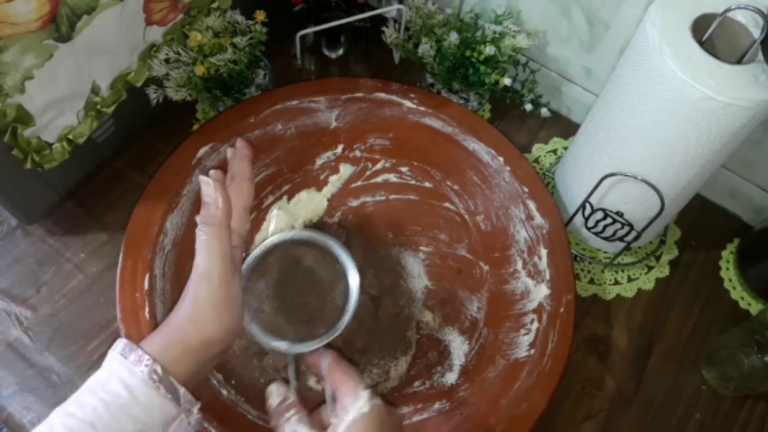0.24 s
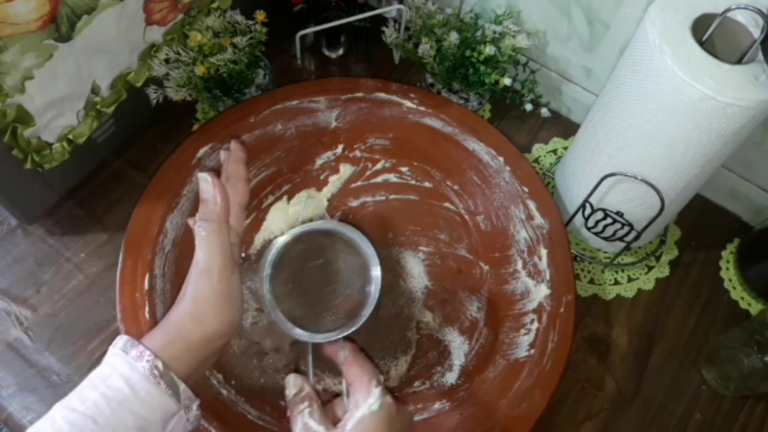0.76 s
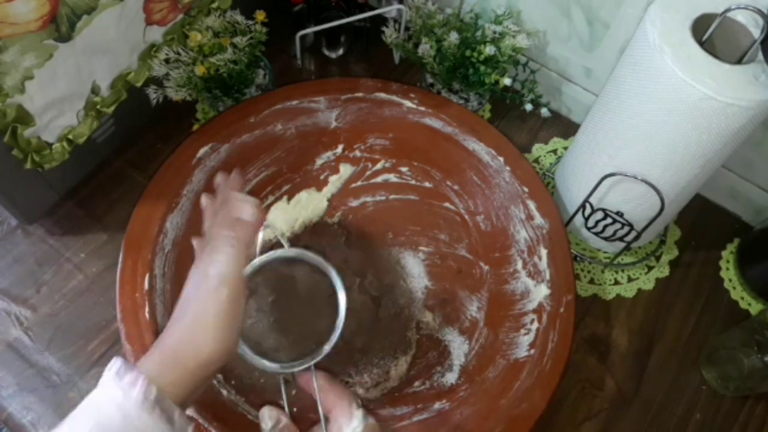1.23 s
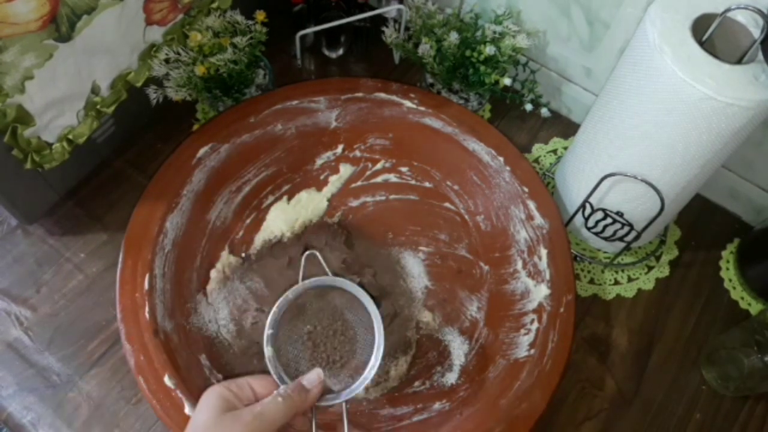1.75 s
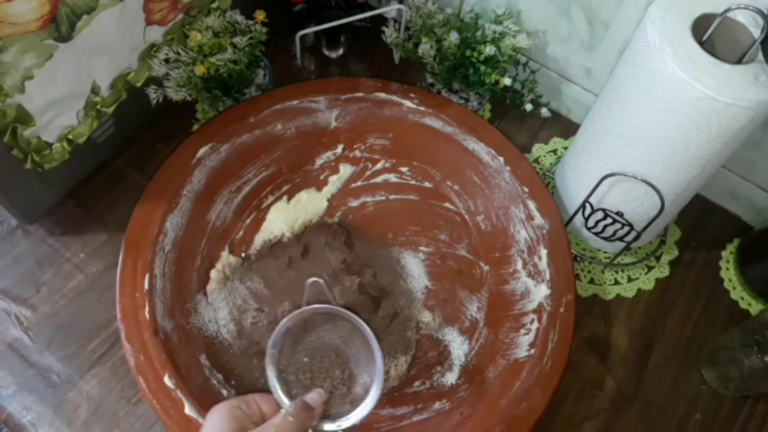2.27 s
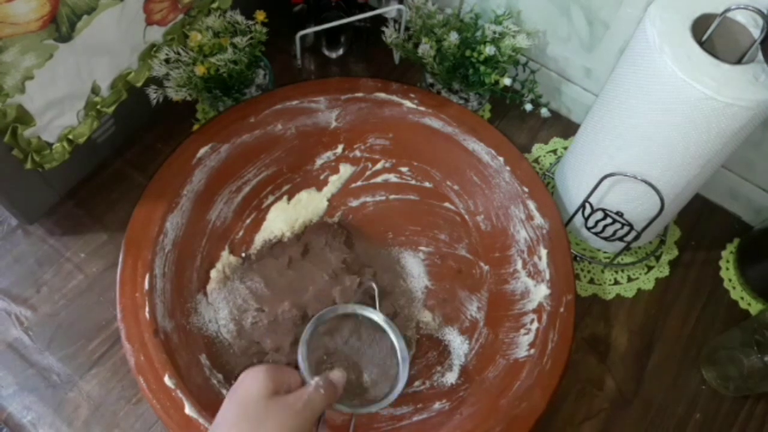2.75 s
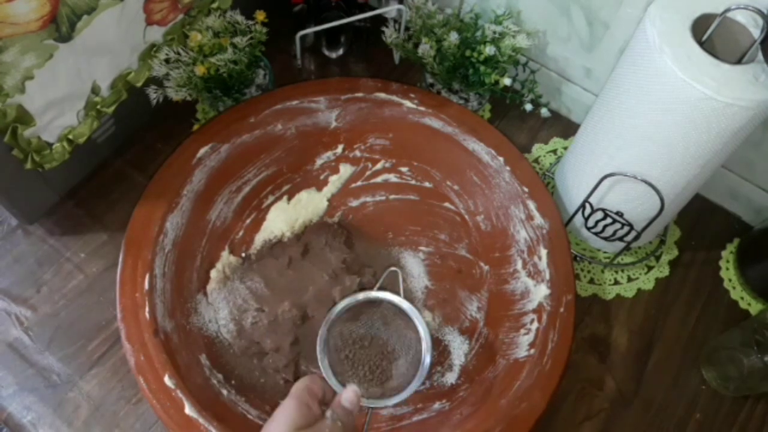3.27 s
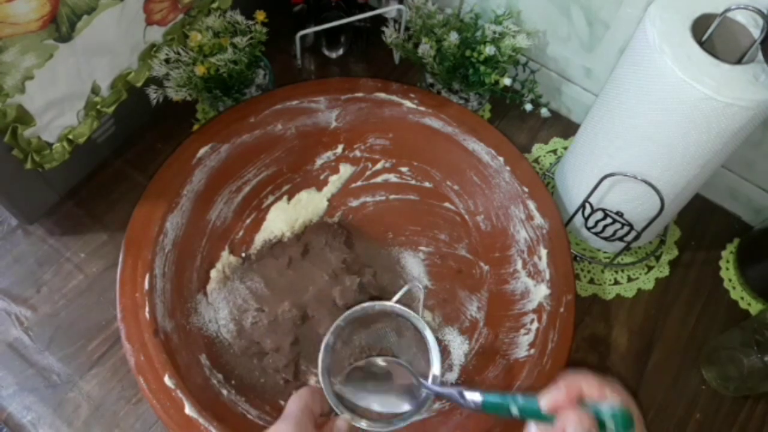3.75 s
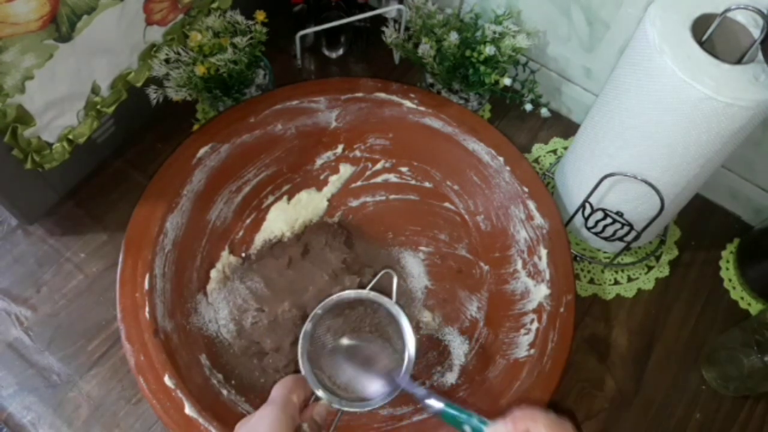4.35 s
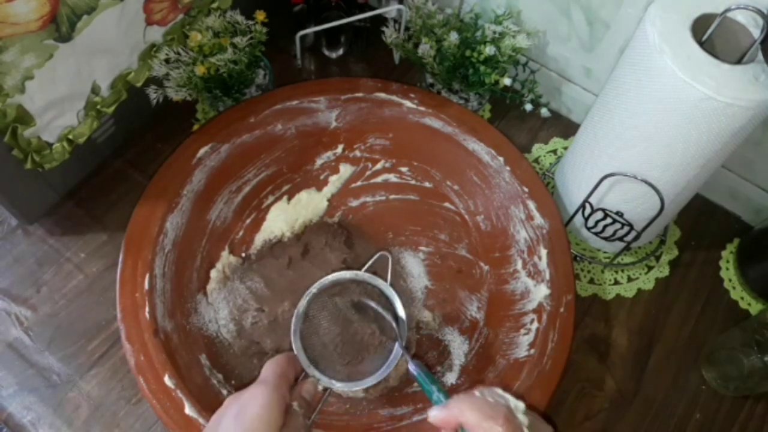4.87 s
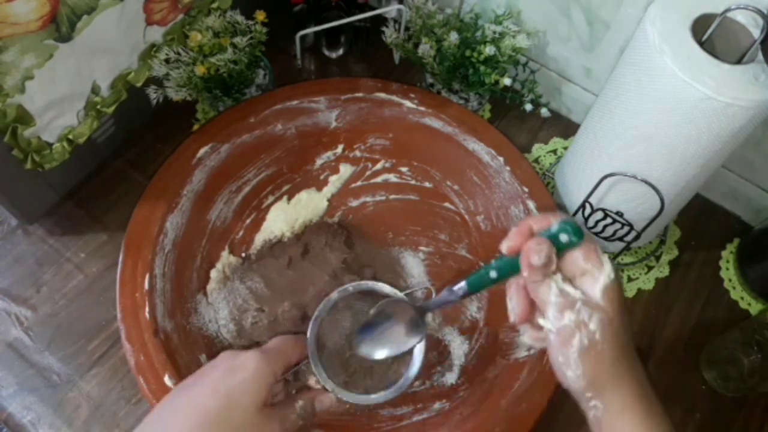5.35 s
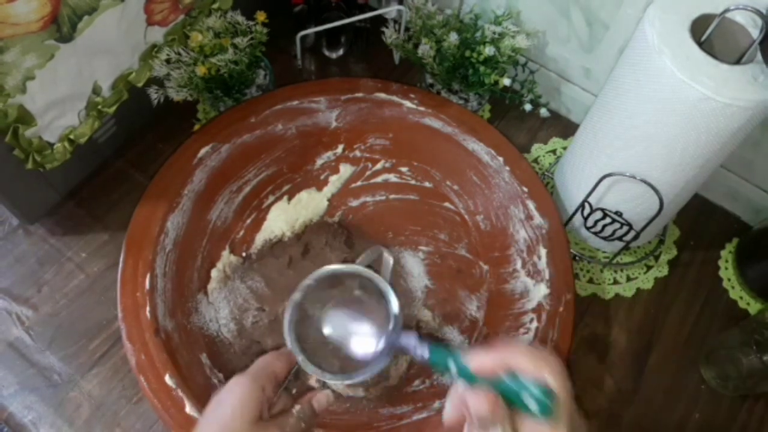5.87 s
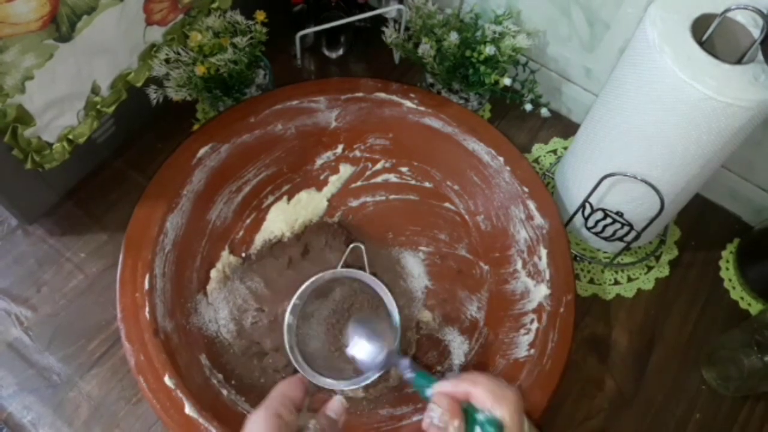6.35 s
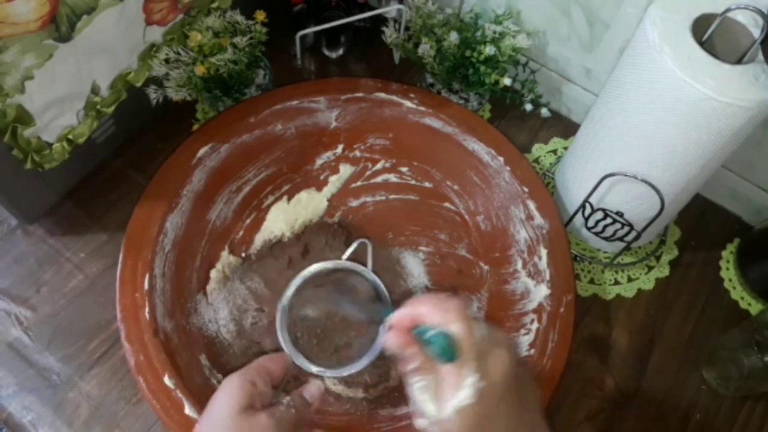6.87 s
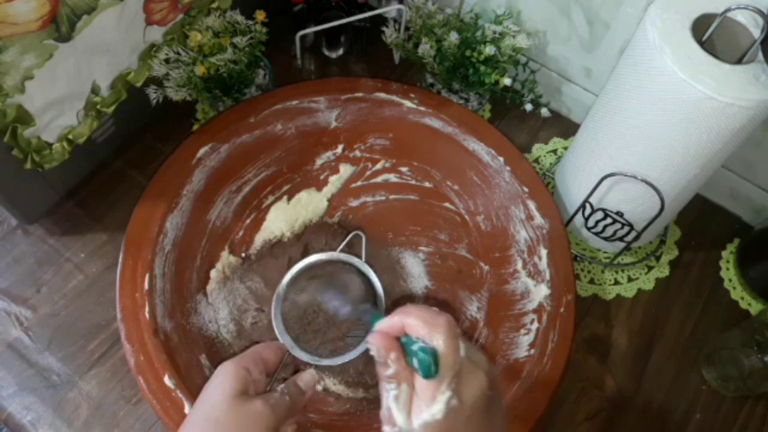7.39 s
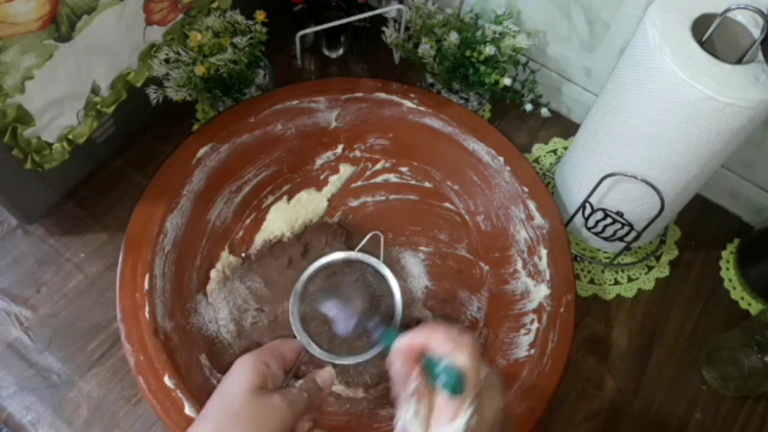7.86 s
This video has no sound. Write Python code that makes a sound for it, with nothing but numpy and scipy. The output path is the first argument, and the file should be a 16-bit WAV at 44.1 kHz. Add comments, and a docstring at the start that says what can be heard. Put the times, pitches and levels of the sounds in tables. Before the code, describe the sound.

Faint rhythmic swishes of powder in a fine sieve come first, over a low room hum and distant engine. Sound drops out briefly, then three metallic knocks crack, thud against the bowl and ring. Tiny ticks lead to sharp clinks and thin, dry scraping on wire mesh, which pauses around a far wavering horn and resumes briskly with dull bumps. Small lively kitchen, close phone pickup with rough highs.

```python
"""A kitchen with traffic and an engine hum outside. A small mesh sieve is shaken over a mixing bowl: powder hisses.
An edit leaves a short silence; then a spoon is knocked clean three times, each a crack, a thud and ringing tones.
Two faint ticks follow. The spoon then taps the rim and scrapes powder through the mesh: noise contacts drive
resonances. Dull bumps and a far horn of wavering overtones join in. The phone changes its sample rate crudely
throughout, which mirrors tones through the treble."""
import sys
import numpy as np
from scipy import signal
from scipy.fft import rfft, irfft, next_fast_len
from scipy.io import wavfile
from scipy.ndimage import map_coordinates

SR = 44100
rng = np.random.default_rng(int(sys.argv[2]) if len(sys.argv) > 2 else 0)


def wav_record(signal):
    """Record a signal, one row per channel, as 16-bit PCM in the file named by sys.argv[1]."""
    frames = np.transpose(np.atleast_2d(signal))
    bounded = np.clip(frames, -1, 1)
    # unit amplitude maps onto the largest positive 16-bit level
    quanta = np.round(bounded * 32767).astype(np.int16)
    wavfile.write(sys.argv[1], SR, quanta)


N = 358091

# resonances of the spoon in the scraping hand: center_hz, width_hz, level_db
SPOON_BODY = [(2280, 1070, -8.5), (2645, 240, 0), (2950, 550, -5.5), (3665, 210, 0.5), (3860, 185, -2.5),
              (4340, 270, -4.5)]
# resonances of the mesh: center_hz, width_hz, level_db
MESH = [(4770, 370, 1.5), (5720, 190, 7.5), (5870, 210, 6), (6360, 230, 7.5), (6690, 320, 7),
        (7270, 910, -2)]
# resonances of the finest wires: center_hz, width_hz, level_db
FINE = [(10470, 67, 8), (11600, 3800, 0.5), (13900, 120, 4), (14100, 2600, -10)]
# spoon taps on the rim: start_s, level_db, low_db and spoon_db (both relative to level_db)
TAPS = [(4.056, -38.5, -15, -5), (4.1498, -41, -18, -11), (4.399, -45, -8, -4), (4.5654, -15.5, -23, -13.5),
        (4.8768, -21.5, -24, -7), (4.9959, -37, -11, -10), (5.5311, -31, -23, -12.5),
        (6.5263, -30, -21, -16), (6.777, -38, -14, -4), (7.0746, -27, -24, -14), (7.2283, -31.5, -11, -4),
        (7.3553, -29, -16, -18), (7.6268, -29, -14, -16), (7.8698, -32, -16, -17)]


def amp(db):
    """Decibels to amplitude."""
    return 10 ** (np.asarray(db) / 20)


def unit(x):
    """x scaled to an RMS of 1."""
    return x / np.sqrt(np.mean(x ** 2) + 1e-20)


def along(points, hz):
    """(Hz, value) points interpolated on a log frequency axis."""
    f, v = np.transpose(points)
    return np.interp(np.log(hz + 1), np.log(f + 1), v)


def curves(rows):
    """One value per sample for each column after the time."""
    s, *cols = np.transpose(rows)
    return [np.interp(np.arange(N) / SR, s, c) for c in cols]


def wobble(rate_hz):
    """A smooth random curve, rate_hz knots a second."""
    knots = rng.standard_normal(int(N * rate_hz / SR) + 4)
    return map_coordinates(knots, [np.arange(N) * rate_hz / SR])


def filtered(x, response):
    """x times a complex response of frequency."""
    m = next_fast_len(len(x) + SR // 2)
    return irfft(rfft(x, m) * response(np.fft.rfftfreq(m, 1 / SR)), m)[:len(x)]


def modes(table):
    """The response of a body with (Hz, width Hz, dB) resonances of alternating sign."""
    return lambda f: sum((-1) ** k * amp(db) * 1j * f * w / (c * c - f * f + 1j * f * w)
                         for k, (c, w, db) in enumerate(table))


def shaped(points):
    """The response of a (Hz, dB) spectrum."""
    return lambda hz: amp(along(points, hz))


def grit(spread_db):
    """Dense contacts of uneven size."""
    return unit(rng.standard_normal(N) * amp(spread_db * wobble(900)))


def room(x):
    """A new diffuse tail of energy 1; each frequency dies at its own speed."""
    # decay of the room: freq_hz, t60_s
    walls = [(100, 0.45), (500, 0.3), (2000, 0.4), (6000, 0.317), (14000, 0.19)]
    hz, t, z = signal.stft(rng.standard_normal(SR * 3 // 4), SR, nperseg=256)
    decay = amp(-60 * t / along(walls, hz)[:, None])
    tail = signal.istft(z * decay, SR, nperseg=256)[1]
    delayed = np.pad(x, (200, 0))
    return signal.fftconvolve(delayed, tail / np.linalg.norm(tail))[:len(x)]


def swell(s, db, rise_s, hold_s, fall_s):
    """An envelope: straight climb in dB to the peak at s, hold, straight fall."""
    span_db = 20  # climbed in rise_s, lost in fall_s
    t = np.arange(N) / SR - s
    away = np.maximum(-t / max(rise_s, .001), (t - max(hold_s, 0)) / max(fall_s, .001))
    return amp(db - span_db * np.maximum(away, 0))


def together(envelopes):
    """Overlapping noises add in power."""
    return np.sqrt(sum(e ** 2 for e in envelopes))


def restless(x, table, drift_db):
    """x through a body whose modes come and go as the point of contact moves."""
    parts = (amp(drift_db * wobble(16)) * filtered(x, modes([mode])) for mode in table)
    return unit(sum((-1) ** k * part for k, part in enumerate(parts)))


def kitchen():
    """Filtered noises: traffic rumble, unsteady hum in the low room modes, faint whines, broad air of the room."""
    # traffic through time: start_s, rumble_db, hum_db
    traffic = [(0, -66, -54.5), (.55, -64, -50.5), (1.05, -68, -54), (1.8, -62, -56), (2.3, -68, -56.5),
               (3.7, -71, -58), (4.7, -66, -54.5), (5.1, -76, -54), (5.45, -65, -55.5), (6.1, -66.5, -60.5),
               (7, -66, -58), (7.4, -72, -60.5), (7.66, -57, -54), (7.9, -74, -57)]
    # rumble spectrum: freq_hz, level_db
    rumble_spectrum = [(20, -120), (30, -15), (58, -8), (80, -6), (100, -120)]
    # low room modes: center_hz, width_hz, level_db
    hum_modes = [(95, 24, -4), (125.4, 11.7, 1.5), (176.7, 10.8, -4.5)]
    # room air through time: start_s, level_db
    air_levels = [(0, -53.5), (1, -55), (2.4, -54.5), (3.6, -54), (5, -54), (6.2, -56), (7, -53.5),
                  (8.12, -51.5)]
    # room air spectrum: freq_hz, level_db
    air_spectrum = [(88, -41.5), (150, -8.5), (230, -5.5), (274, -5.5), (531, -7.5), (586, -7), (1110, -10),
                    (2000, -17.5), (2570, -20.5), (3250, -23), (4020, -23), (4700, -29.5), (6670, -30),
                    (8420, -44.5), (15700, -36)]
    # narrow, slightly wavering bands: center_hz, width_hz (of one of two equal passes), level_db
    whines = [(499, 7.2, -67), (542, 56, -66), (370, 59, -65.5), (6790, 330, -84)]
    # thin whistling band and broader hiss above it: start_s, whistle_db, hiss_db
    whistle_levels = [(0, -77, -65), (1.2, -73, -75), (1.7, -69.5, -74.5), (3.7, -67.5, -66),
                      (4.4, -62, -66), (5.4, -65.5, -68.5), (6.2, -86, -89), (8.12, -76.5, -75.5)]

    def noise(response):
        return unit(filtered(rng.standard_normal(N), response))

    def narrow(hz, width_hz):
        return noise(lambda f: modes([(hz, width_hz, 0)])(f) ** 2)

    rumble_db, hum_db = curves(traffic)
    air_db, = curves(air_levels)
    whistle_db, hiss_db = curves(whistle_levels)
    rumble = amp(rumble_db + 1.3 * wobble(6.8)) * noise(shaped(rumble_spectrum))
    hum = amp(hum_db + 1.4 * wobble(7)) * noise(modes(hum_modes))
    air = amp(air_db + 0.44 * wobble(6.7)) * noise(shaped(air_spectrum))
    whine = sum(amp(db + wobble(3)) * narrow(hz, width_hz) for hz, width_hz, db in whines)
    whistle = amp(whistle_db) * narrow(2582, 175)
    hiss = amp(hiss_db) * narrow(4030, 1100)
    return rumble + hum + air + whine + whistle + hiss


def engine():
    """A far engine: a slowly drifting firing tone and a tone at four times its rate."""
    # engine through time: start_s, firing_hz, level_db, fourth_db
    drift = [(0, 57.5, -65, -62), (.7, 57.5, -57, -59), (1.4, 58.5, -59, -62), (2, 60.7, -70, -56.5),
             (2.47, 61, -72, -57.5), (2.61, 60, -73, -63)]
    hz, level_db, fourth_db = curves(drift)
    turn = 2 * np.pi * np.cumsum(hz * (1 + 0.0051 * wobble(7.3))) / SR
    firing = amp(level_db + 1.5 * wobble(5)) * np.sin(turn)
    return firing + amp(fourth_db + 2.5 * wobble(8)) * np.sin(4 * turn)


def shaking():
    """Powder slides over the mesh at every shake: shaped grit under swells."""
    # shakes of the sieve: peak_s, hiss_db, rise_s, hold_s, fall_s
    shakes = [(0.0, -66, .1, 0, .15), (0.15, -61, .12, 0, .15), (0.33, -61.5, .12, 0, .13),
              (0.485, -61, .14, 0, 0.11), (0.612, -57.5, 0.055, 0, .05), (0.65, -59, .04, .01, .13),
              (0.79, -61.5, .12, 0, 0.13), (0.935, -57.5, .05, 0.0069, .05),
              (0.986, -59.5, .04, 0.048, .04), (1.1, -61, .07, .06, .04), (1.26, -66, .04, .02, .1),
              (1.36, -69, .08, 0, .1), (1.92, -72, .04, 0, .6), (2.22, -71, .25, 0, .25)]
    # powder spectrum: freq_hz, level_db
    powder = [(2650, -49), (4500, -13.5), (5580, -11), (6840, -4.5), (7090, -4), (7870, -23), (9070, -16.5),
              (12100, -10), (15700, -15.5)]
    hiss = unit(filtered(grit(spread_db=1.5), shaped(powder)))
    return together(swell(*row) for row in shakes) * hiss


def knocks():
    """Each blow cracks, thuds in the bowl and rings the spoon; the grip detunes its twin strongest modes: they beat."""
    # blows: start_s, level_db, thud_db, further_db, strongest_db (these three relative to level_db),
    # twin_share (-1 to 1), strongest_hold_s, strongest_fall_s, hand_damps_after_s
    blows = [(2.732, -29, -9, 9.5, -1.5, 0.49, 0.057, 0.077, 0.073),
             (2.9732, -14.5, 1, 5, -4, -0.63, 0.022, 0.16, 0.24),
             (3.1636, -12, 4, 0, -4, -0.34, 0.074, .16, .28)]
    # strongest mode and its twin under each grip: strongest_hz, twin_hz
    twins = [(2277, 2294.5), (2297.5, 2266), (2266.5, 2281.5)]
    # further ringing tones: freq_hz, level_db, t60_s
    further_tones = [(1625, -34, .3), (3700, -24, .07), (4200, -27, .04), (6070, -27, .15),
                     (6121, -21, .28), (6190, -27, .12), (8783, -32, .18), (9625, -34, .12),
                     (10600, -38, .12), (12775, -35, .25)]
    # what the spoon is knocked on: center_hz, width_hz, level_db
    bowl = [(248, 51, -7.5), (356, 62, -2), (490, 130, -0.5), (660, 180, -1.5), (850, 136, 3.5),
            (1030, 270, 0), (1660, 750, 1), (1760, 83, -10)]
    # crack spectrum: freq_hz, level_db
    crack_spectrum = [(90, -48.5), (220, -14), (780, -5.5), (1500, -12.5), (2100, -0.5), (3200, -11.5),
                      (4100, -9), (5000, -19), (6150, -10), (7300, -31.5), (9800, -35.5), (15700, -48)]
    # early reflections: delay_s, level_db
    near_walls = [(.005, -7), (.012, -6), (.027, -8)]
    twin_fade_db_per_s = 14.5  # the twin dies sooner, so the beat grows shallow
    out, t, now = np.zeros(N + SR), np.arange(SR) / SR, np.arange(N) / SR
    for row, (hz, twin_hz) in zip(blows, twins):
        s, db, thud_db, further_db, strongest_db, share, hold_s, fall_s, free_s = row
        since = now - s
        twin = share * amp(-twin_fade_db_per_s * np.abs(since)) * np.sin(2 * np.pi * twin_hz * since)
        strongest = np.sin(2 * np.pi * hz * since) + twin
        out[:N] += swell(s, db + strongest_db, 0, hold_s, fall_s) * np.sqrt(2) * strongest

        further = sum(amp(level_db + rng.normal(0, 0.67) - 60 * t / t60_s) * np.sin(2 * np.pi * f * t)
                      for f, level_db, t60_s in further_tones)
        fingers = amp(-150 * np.maximum(t - free_s, 0))  # the hand closes on the handle and damps it

        burst = amp(-60 * t / .009) * rng.standard_normal(SR)
        crack = filtered(np.roll(burst, 30), shaped(crack_spectrum)) * (t < .2)
        push = np.exp(-((t - .0006) / .00025) ** 2)  # one short shove of hard metal
        thud = filtered(push, modes(bowl))
        impact = crack / np.linalg.norm(crack) + amp(thud_db) * thud / np.linalg.norm(thud)
        blow = amp(db + 19) * impact + amp(db + further_db) * further * fingers
        early = sum(amp(wall_db) * np.roll(blow, round(delay_s * SR)) for delay_s, wall_db in near_walls)
        out[round(s * SR):][:SR] += blow + early + amp(0.5) * room(blow)
    return out[:N]


def ticks():
    """Tiny dry ticks: decaying noise through one broad treble resonance."""
    # faint bright ticks: start_s, level_db (before the resonance)
    tick_rows = [(3.5603, -50), (3.801, -52)]
    t, out = np.arange(SR // 50) / SR, np.zeros(N)
    for s, db in tick_rows:
        out[round(s * SR):][:len(t)] += amp(db - 60 * t / 0.0072) * rng.standard_normal(len(t))
    return filtered(out, modes([(11900, 9000, 0)]))


def scraping():
    """One stream of grit excites mesh, spoon and the finest wires; the stroke shares it out."""
    # spoon strokes: peak_s, rasp_db, rise_s, hold_s, fall_s, body_db, hiss_db (last two relative to rasp_db)
    strokes = [(3.992, -62.5, 0.018, 0.056, .14, 1, 0), (4.157, -46, 0.029, .01, 0.071, 1.5, -0.5),
               (4.273, -51, 0.053, 0.0081, 0.084, -0.5, -2), (4.4, -65, 0.074, 0, 0.14, 9.5, -12),
               (4.586, -50, .01, 0.078, .09, 0.5, -3.5), (4.893, -54.5, .02, 0.055, 0.11, 0, -4.5),
               (5.003, -69, .06, 0.078, 0.09, 0, 2), (5.485, -62.5, .012, 0.031, .03, 0, -2),
               (5.54, -55, .01, 0, 0.11, 0, -5), (5.7, -57, .02, 0.008, 0.25, 2, -6),
               (6.355, -75, .01, 0.024, 0.11, -1, 1), (6.54, -53.5, 0.029, 0.015, 0.13, -2, -7),
               (6.673, -51, .04, 0.015, 0.11, 0.5, -2.5), (6.825, -50.5, .018, 0.074, 0.061, 1, -4.5),
               (6.999, -45, 0.059, 0.016, 0.075, -1.5, -1.5), (7.104, -44.5, 0.046, 0.017, 0.1, 2.5, -4),
               (7.287, -47, .06, .015, .11, 2.5, -2.5), (7.397, -47, 0.054, 0.033, 0.07, 1.5, -7),
               (7.527, -46, 0.047, 0.029, .08, 1.5, -2.5), (7.632, -45.5, .01, 0.047, 0.055, -1.5, -7.5),
               (7.774, -46.5, 0.063, .015, 0.082, 1.5, -2.5), (7.874, -46, .01, 0.019, .09, -2.5, -7),
               (8.036, -47, 0.052, 0.014, 0.064, 1.5, -4)]
    # every tap shakes the powder: jolt_db is relative to the tap, shares as in a stroke
    jolt_db, jolt_fall_s, jolt_body_db, jolt_hiss_db = -19.5, 0.021, 0.5, -9.5
    contacts = grit(spread_db=1.5) * amp(1.06 * wobble(90))
    rasp = restless(contacts, MESH, drift_db=2.0)
    body = restless(contacts, SPOON_BODY, drift_db=3.0)
    hiss = restless(contacts, FINE, drift_db=1.0)
    jolts = [(s + .002, db + jolt_db, 0, 0, jolt_fall_s, jolt_body_db, jolt_hiss_db) for s, db, *_ in TAPS]
    moves = [(swell(*shape), amp(body_db), amp(hiss_db)) for *shape, body_db, hiss_db in strokes + jolts]
    out = rasp * together(e for e, _, _ in moves)
    out = out + body * together(e * b for e, b, _ in moves)
    out = out + hiss * together(e * h for e, _, h in moves)
    return out + amp(-9.5) * room(out)


def taps():
    """Short rattling contacts that ring mesh, spoon and rim in their own shares."""
    chatter_s = .013
    first_db, first_s = -0.5, 0.0018  # the first contact stands out of the chatter and dies in first_s
    t, (mesh, low, spoon) = np.arange(SR // 8) / SR, np.zeros((3, N + SR))
    for s, db, low_db, spoon_db in TAPS:
        chatter = amp(-60 * (t / chatter_s) ** 2)  # a few ms, then silence
        first = amp(first_db - 60 * t / first_s)
        burst = amp(db) * (chatter + first) * rng.standard_normal(len(t))
        for part, part_db in ((mesh, 0), (low, low_db), (spoon, spoon_db)):
            part[round(s * SR):][:len(t)] += amp(part_db) * burst

    def wires(f):
        return modes(MESH)(f) + amp(-5) * modes(FINE)(f)

    dry = amp(-8.5) * filtered(mesh[:N], wires)
    dry += amp(8.0) * filtered(spoon[:N], modes(SPOON_BODY))
    dry += amp(10.5) * filtered(low[:N], modes([(1380, 860, 0.0067)]))
    dry += amp(-21) * filtered(mesh[:N], modes([(11000, 8600, 0)]))  # the bare click of steel on steel
    return dry + amp(-8.0) * room(dry)


def bumps():
    """Soft low knocks: decaying noise bursts ring a few low modes."""
    # dull bumps: start_s, level_db (before the gain below)
    bump_rows = [(5.78, -54), (6.49, -52), (6.76, -52), (8.022, -41.5), (8.05, -47), (8.082, -48)]
    # bump resonances: center_hz, width_hz, level_db
    bump_modes = [(382.6, 14.5, 8.5), (520, 51, -4.5), (1060, 360, -10)]
    t, push = np.arange(SR // 10) / SR, np.zeros(N + SR)
    for s, db in bump_rows:
        push[round(s * SR):][:len(t)] += amp(db + 22.0 - 60 * t / 0.11) * rng.standard_normal(len(t))
    dry = filtered(push[:N], modes(bump_modes))
    return dry + amp(0.5) * room(dry)


def horn():
    """A far horn: only the overtones near the resonance of its disc arrive, each wavering on the way."""
    # toots: peak_s, level_db, hold_s, fall_s
    toots = [(6.007, -58, .12, .05), (6.19, -71.5, .1, .05), (6.33, -68, 0.083, .04)]
    # overtones: multiple of horn_hz, level_db
    overtones = [(6, -14), (7, -16), (8, -14), (9, -0.5), (10, -5.5), (11, -6), (12, -28)]
    horn_hz, rise_s = 337, .04
    dull_db, brightens_db_per_s = -5, 60  # the upper overtones grow during a toot
    out, now = np.zeros(N), np.arange(N) / SR
    turn = 2 * np.pi * np.cumsum(horn_hz * (1 + 0.0068 * wobble(12))) / SR
    for s, level_db, hold_s, fall_s in toots:
        bright_db = dull_db + brightens_db_per_s * np.clip(now - s, 0, hold_s)
        envelope = swell(s, level_db, rise_s, hold_s, fall_s)
        for k, db in overtones:
            tilt_db = bright_db * max(round(k) - 9, 0)  # above the strongest overtone
            level = amp(db + tilt_db + 4.6 * wobble(22))
            out += envelope * level * np.sin(round(k) * turn + rng.uniform(0, 2 * np.pi))
    return out + amp(-14) * room(out)


def scene():
    """All sources summed, one channel."""
    steady = kitchen() + engine()
    sieve = shaking() + knocks() + ticks() + scraping() + taps()
    return (steady + sieve + bumps() + horn())[None]


def record(dry):
    """The rate change takes the nearest microphone sample, which mirrors every tone through the treble."""
    # silence left by the edit: start_s, end_s
    silence = (2.4725, 2.6108)
    mic_rate_hz, top_hz = 47989.6, 15740  # rate before the change, steep upper limit
    step = mic_rate_hz / SR
    nearest = map_coordinates(dry[0], [np.round(np.arange(N) * step) / step], order=5)
    t = np.arange(N) / SR
    edited = nearest * ((t < silence[0]) | (t > silence[1]))
    return filtered(edited, lambda hz: 1 / (1 + (hz / top_hz) ** 2000))[None]


dry = scene()
out = record(dry)
wav_record(out)
```